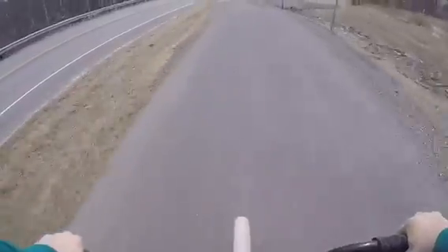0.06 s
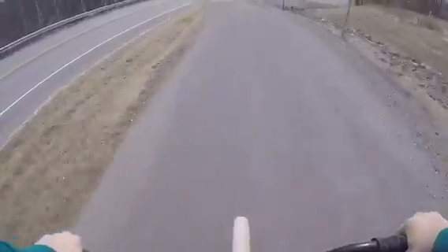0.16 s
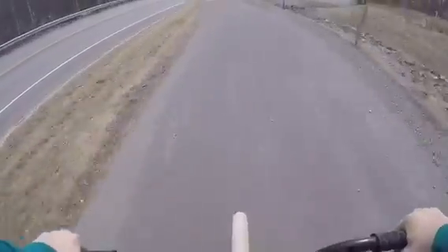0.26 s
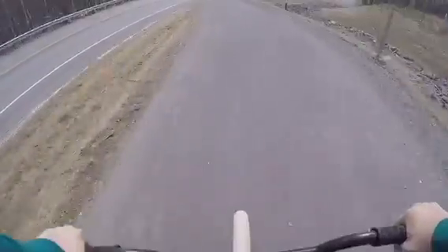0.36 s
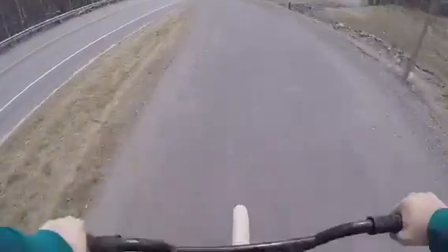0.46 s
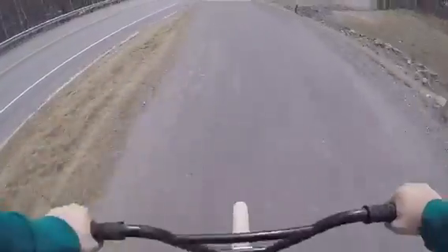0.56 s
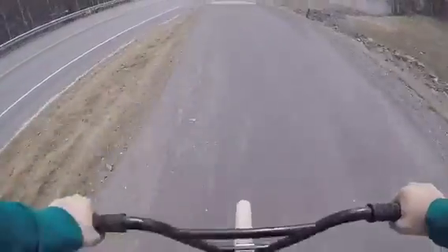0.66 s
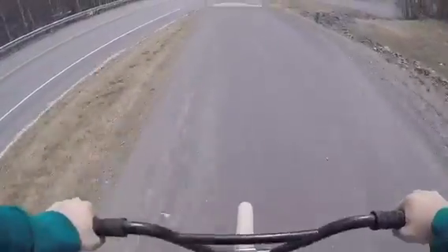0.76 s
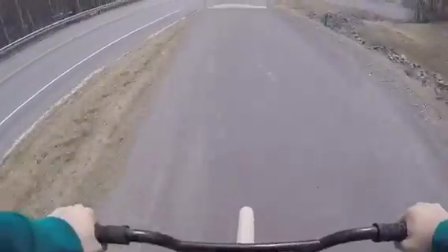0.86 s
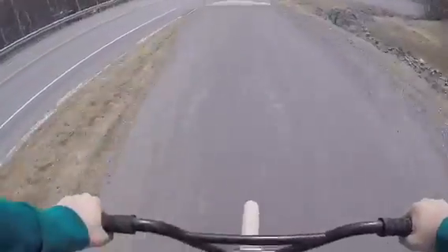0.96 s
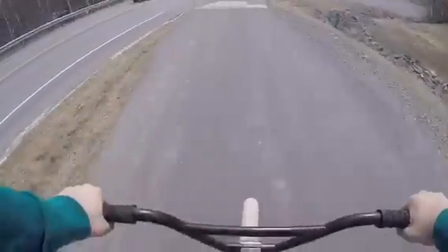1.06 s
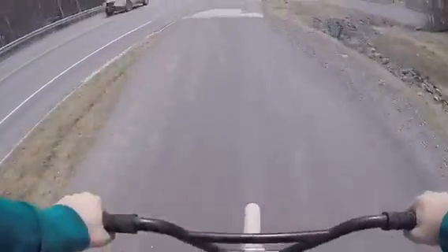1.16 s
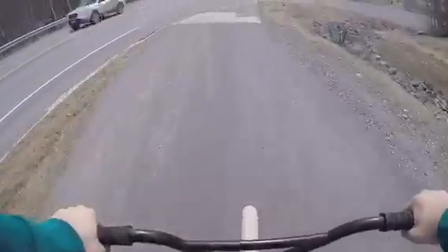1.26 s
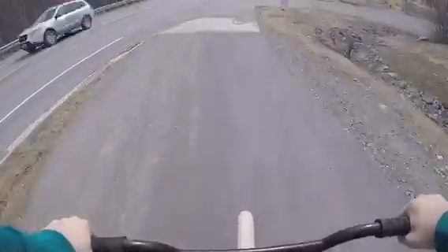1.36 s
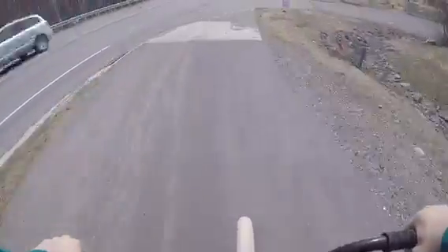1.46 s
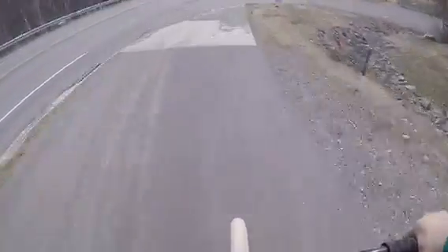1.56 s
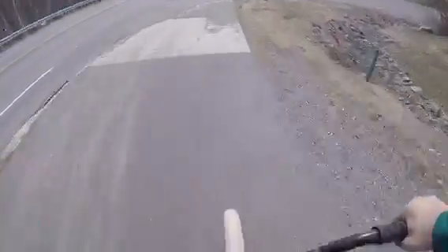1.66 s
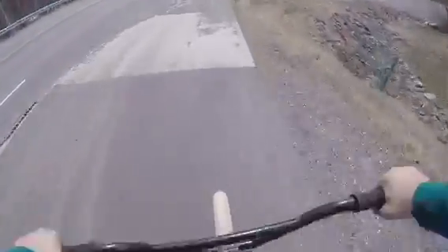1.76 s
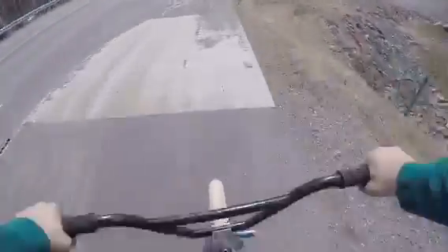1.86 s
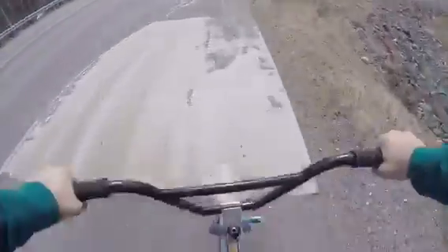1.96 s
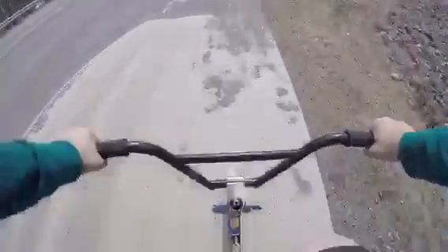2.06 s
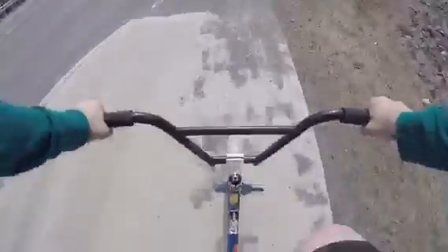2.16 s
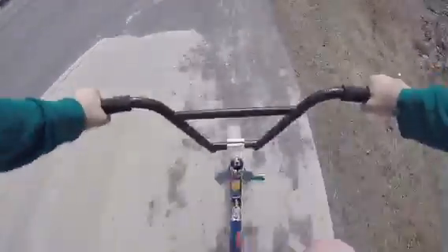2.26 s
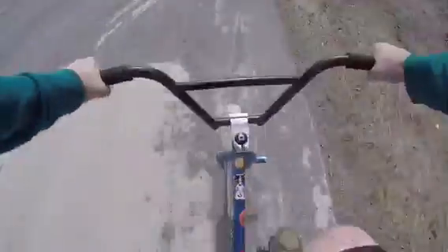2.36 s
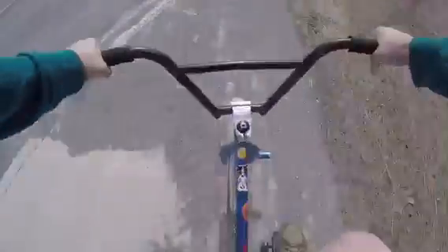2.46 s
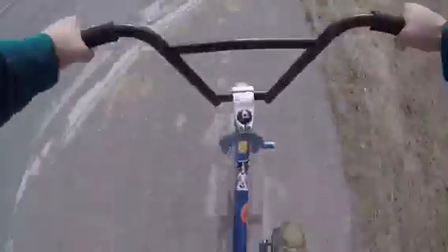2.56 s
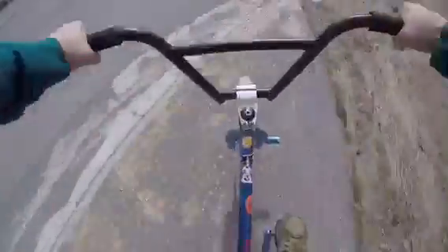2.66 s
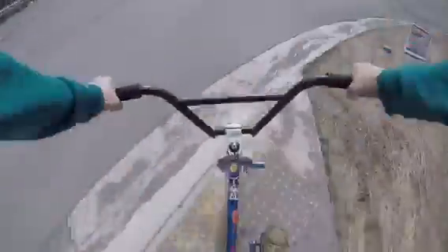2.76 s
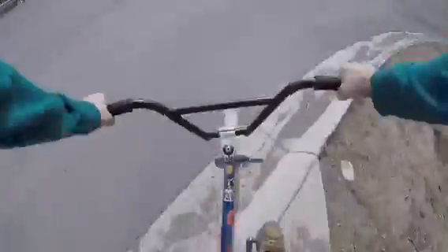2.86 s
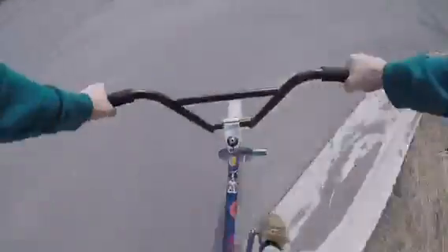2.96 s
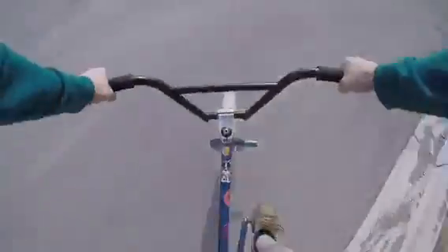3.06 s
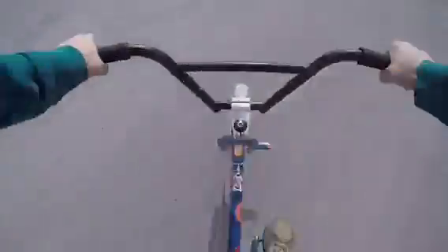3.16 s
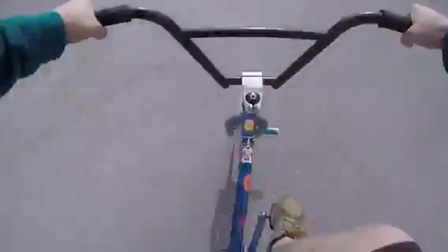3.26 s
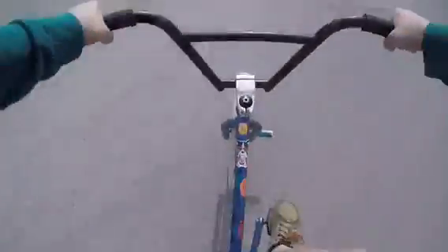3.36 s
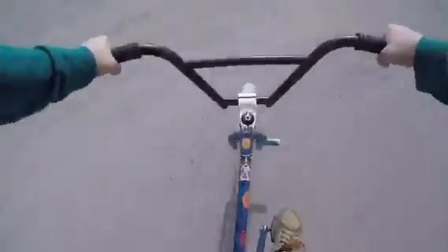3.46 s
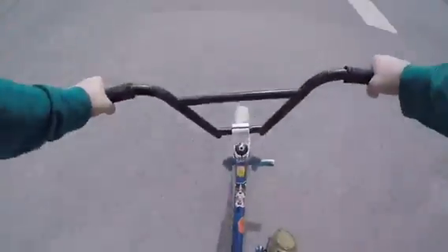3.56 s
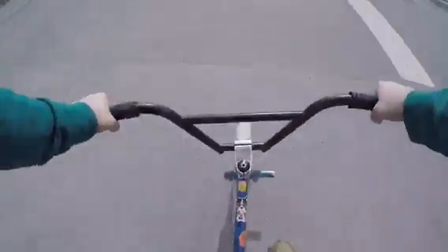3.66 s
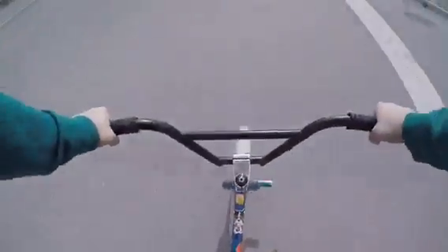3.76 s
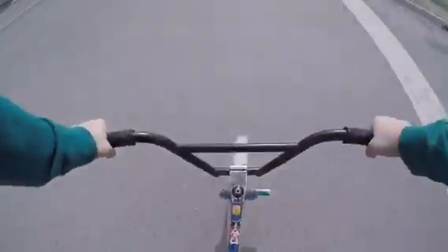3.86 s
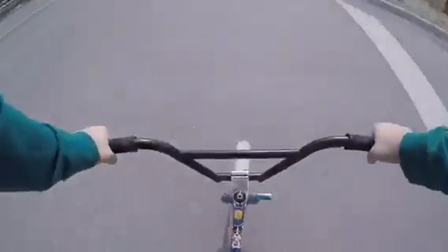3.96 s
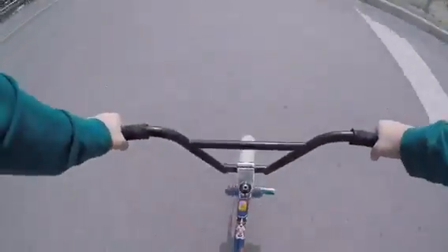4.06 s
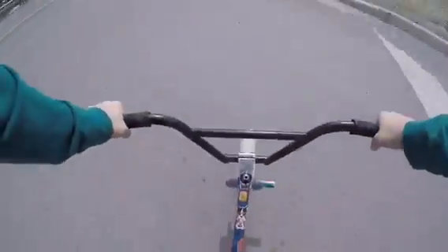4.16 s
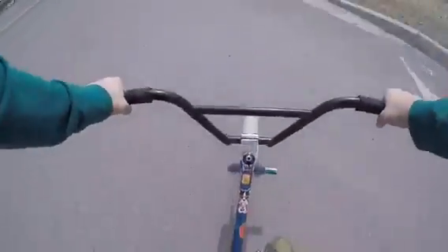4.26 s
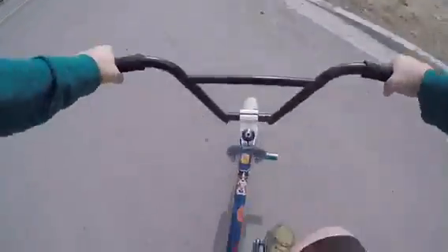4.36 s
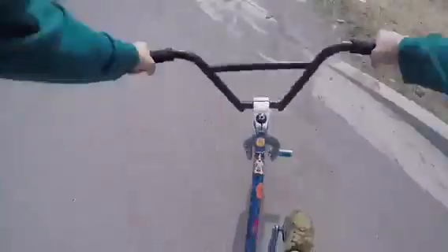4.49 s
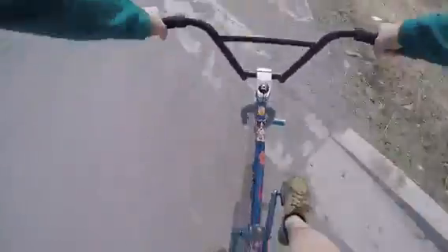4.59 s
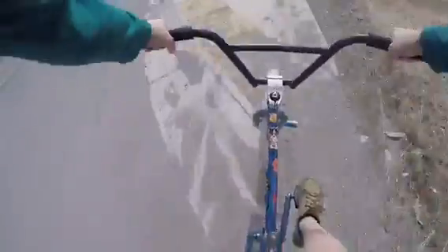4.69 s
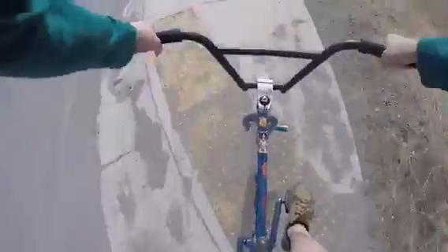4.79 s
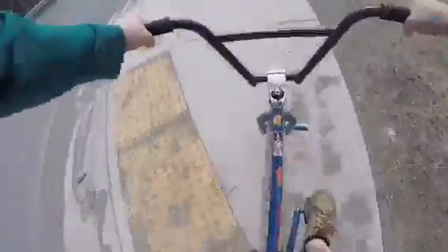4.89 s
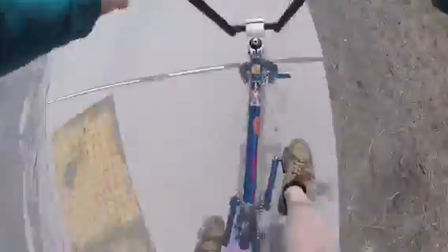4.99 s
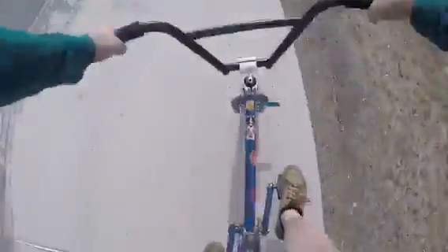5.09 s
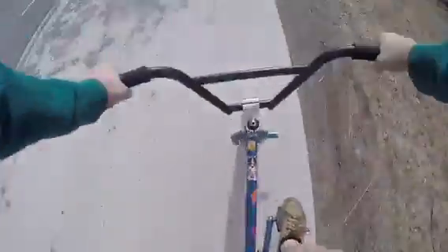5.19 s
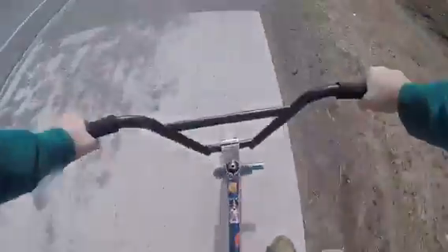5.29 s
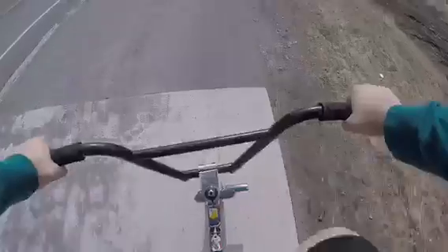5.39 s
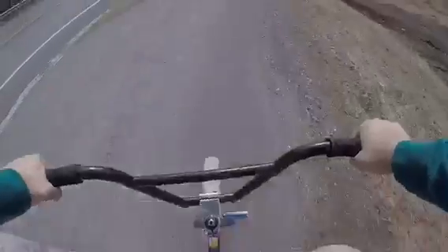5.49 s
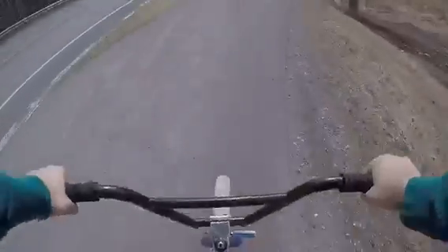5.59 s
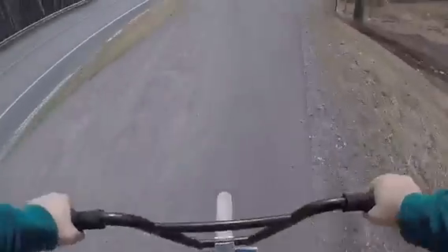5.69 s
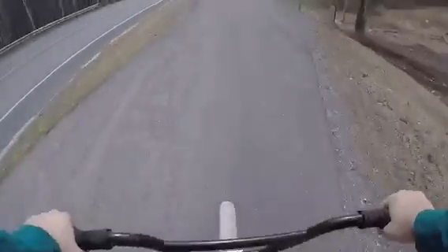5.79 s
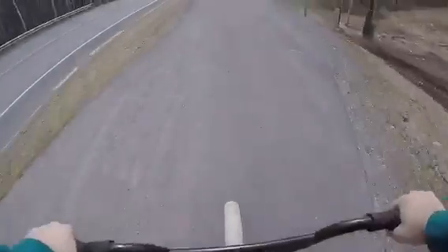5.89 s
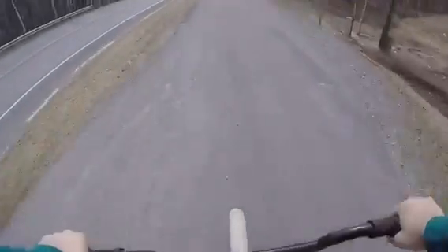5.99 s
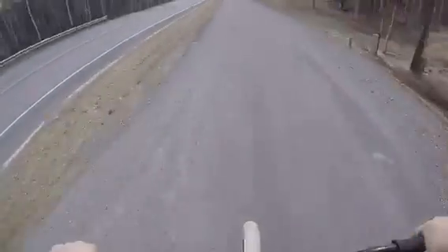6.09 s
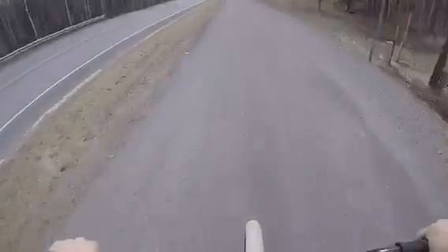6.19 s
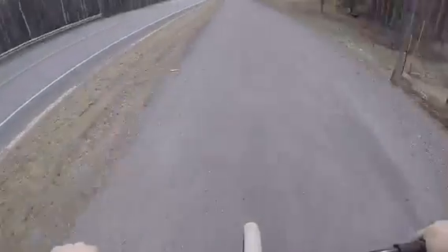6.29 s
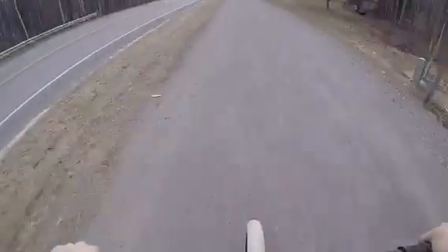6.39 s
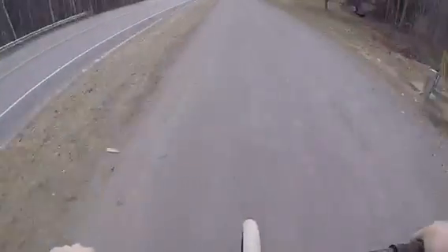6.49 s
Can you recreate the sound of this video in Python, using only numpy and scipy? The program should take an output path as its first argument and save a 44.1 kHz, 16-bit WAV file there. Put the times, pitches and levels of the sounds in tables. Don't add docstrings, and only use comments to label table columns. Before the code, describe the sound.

Hard wheels rush down pavement as a foot brake squeals in broken shrieks, then kerb joints clatter and bang through gusty wind.

```python
import sys
import numpy as np
from scipy import signal
from scipy.fft import rfft, irfft, next_fast_len
from scipy.io import wavfile
from scipy.ndimage import uniform_filter1d

SR = 44100
rng = np.random.default_rng(int(sys.argv[2]) if len(sys.argv) > 2 else 0)


def ratio(d):
    e = np.asarray(d, float) / 20
    return 10 ** e


def unload_wav(signal):
    wavfile.write(
        sys.argv[1],
        SR,
        np.round(np.clip(np.atleast_2d(signal).T, -1, 1) * 32767).astype(np.int16),
    )


N = 288414

# [t/s, level/dB]
CAR_LEVEL = [
    (.9, -53),
    (1.3, -49.5),
    (1.65, -40),
    (1.95, -44.5),
    (2.4, -52),
]
# [f/Hz, density/(dB per Hz)]
TYRE_SPECTRUM = [(300, -20.5), (550, -16), (720, -1.5), (1100, -16), (1900, -6), (2400, -12), (4000, -51)]
# [mid t/s, half length/s, level/dB]
GUSTS = [(0.326, 0.09, -25), (0.67, 0.11, -27), (0.88, 0.085, -18), (1.1, 0.15, -27), (1.36, 0.096, -19.5),
         (2.14, 0.29, -27.5), (2.464, 0.027, -24), (2.676, 0.019, -26), (1.717, 0.068, -24),
         (3.067, 0.054, -21), (3.158, .03, -38), (3.926, 0.037, -22.5), (4.554, 0.016, -30),
         (4.95, 0.09, -21), (5.46, 0.15, -38), (5.68, 0.081, -22.5), (5.98, 0.076, -22),
         (6.467, 0.021, -23)]
# [f/Hz, density/(dB per Hz)]
BUFFET_SPECTRUM = [(10, -8.5), (22, 1), (35, -7), (50, -18.5), (70, -35.5), (110, -56.5), (300, -91)]
# [f/Hz, density/(dB per Hz)]
EDGE_SPECTRUM = [(30, -41), (60, 10.5), (90, -6), (130, 0), (180, -2), (300, -36.5), (800, -48)]
# [t/s, level/dB]
MOUNT_SHUDDER = [(0.0, -47), (0.25, -51), (1.89, -49.5), (2.24, -43.5), (2.5, -53), (2.75, -43),
                 (2.97, -40), (3.31, -54), (3.48, -47), (3.81, -43.5), (4.24, -50), (5.03, -39),
                 (5.52, -49.5), (5.72, -53), (6.05, -53), (6.54, -58)]
# [t/s, peak/dB, first swing f/Hz, direction/+-1, stop hardness/0-1]
JOLTS = [(2.553, -22.5, 29.8, -1, 0), (2.598, -10, 29.3, -1, 0.1), (2.841, -6, 31, 1, 0),
         (3.194, -4, 29, 1, 0.17), (3.2498, -6.5, 56, -1, 0.6), (3.364, -11, 29.7, -1, 0.24),
         (4.607, 1, 31.7, 1, 1), (5.0374, 0, 40, 1, 0.28), (5.474, -18.5, 79, -1, 0.75),
         (5.589, -19, 61, 1, 0.25), (5.616, -17, 31.7, -1, 0), (5.706, -16.5, 50, 1, 1)]
# [t/s, peak/dB, half length/s, direction/+-1]
THUMPS = [(2.582, -22, .002, -1), (2.671, -19, 0.0028, -1), (2.9, -22, 0.0052, 1), (2.9, -19, 0.0035, -1),
          (2.815, -18, 0.004, 1), (2.829, -9, 0.0023, -1), (2.832, -25, 0.0016, 1), (3.324, -11, 0.0037, 1),
          (3.339, -6, 0.0024, -1), (3.344, -5, 0.0031, 1), (3.354, -14, 0.0023, -1),
          (3.205, -9.5, 0.0037, 1), (2.6, -11, 0.0055, 1), (4.627, -13, .006, 1), (3.358, -21, 0.0023, -1),
          (4.606, -18, 0.0015, -1), (4.1, -27, 0.0024, 1)]
# [t/s, peak/dB, f/Hz, length/cycles]
SNAPS = [(3.2059, -2, 2650, 1.3), (3.2076, -14, 4180, 1.5), (3.2078, -8, 1400, 1.5),
         (3.2343, -24, 2400, 1.4), (3.3088, -19, 1100, .9), (3.3092, -25, 3200, 2.),
         (3.3213, -16, 1000, 1.1), (3.331, -15, 2630, 2.4), (3.3315, -19, 1600, 1.5),
         (3.3352, -14.5, 2020, 1.4), (3.339, -22, 2800, 2.2), (3.3428, -22, 2600, 2.1),
         (3.346, -23, 2700, 2.4), (3.35, -25, 1500, 1.2), (3.3612, -24, 2600, 2.), (3.3615, -26, 1400, 1.3),
         (2.6968, -22, 1150, 1.3), (2.681, -27, 900, 1.4), (2.737, -19, 3000, 2.3), (2.799, -28, 1610, 4.),
         (2.8286, -18.5, 2400, 1.7), (2.827, -22, 1000, 1.6), (2.833, -23, 2800, 2.2),
         (2.4392, -18, 2700, 2.2), (2.5285, -24, 2890, 2.4), (3.479, -32, 3300, 2.2),
         (3.588, -30, 2600, 1.8), (3.695, -35, 4600, 2.4), (3.796, -32, 2300, 1.8), (4.083, -23, 3240, 2.4),
         (4.255, -29, 4300, 2.6), (4.384, -31, 2600, 1.8), (4.611, -19, 2600, 4.), (4.854, -27, 2724, 4.),
         (2.596, -16, 1000, 1.9), (4.876, -17, 2750, 3.9), (4.8915, -15, 2500, 2.8),
         (4.9983, -17, 2500, 3.), (5.047, -18.5, 2840, 3.), (5.0755, -25, 815, 1.6)]
# [t/s, peak/dB, ring f/Hz, crack re knock/dB]
KNOCKS = [(2.5838, -10, 960, -20), (2.585, -9, 398, -20), (2.592, -14, 570, -23), (2.343, -31, 4050, -20),
          (2.677, -28, 754, -6), (2.697, -16.5, 563, -16), (2.822, -20.5, 310, 14), (2.834, -14.5, 756, 0),
          (3.2075, -4.5, 400, -6), (3.2089, 4, 938, -14), (3.2145, -11, 570, -26), (3.2335, -16, 836, -3),
          (3.283, -28, 864, -20), (3.302, -28, 1000, -10), (3.3109, -4.5, 963, -10), (3.3126, -9, 433, -20),
          (3.321, -16, 830, -4), (3.336, -2, 900, -14), (3.347, -20, 301, 7), (4.388, -31, 625, 5),
          (4.538, -20, 910, -15), (4.548, -18, 930, -10), (4.577, -10.5, 1100, -20), (4.588, -15, 800, 11),
          (4.5953, -12, 1770, -5), (4.596, -6, 552, -14), (4.603, -12.5, 945, 0), (4.605, -8, 594, 7.5),
          (4.609, -15, 960, 14), (4.638, -18.5, 915, -28), (4.707, -16.5, 950, -33), (4.803, -27, 346, -15),
          (4.875, -19.5, 3760, -20), (4.944, -19, 306, -8), (5.003, -8.5, 286, -20), (4.9975, 2, 1022, -14),
          (5.0012, -2.5, 760, -13), (5.0067, -16, 605, 0), (5.012, -11.5, 490, 2), (5.02, -11.5, 616, 8),
          (5.0243, -10.5, 936, 6), (5.029, -16, 1010, 13.5), (5.0724, -19, 1000, -8),
          (5.076, -19.5, 686, -12), (5.331, -28.5, 1070, 15), (5.477, -28, 1057, -14), (5.584, -35, 625, 1),
          (5.706, -31, 303, -19)]
# [t/s, length/s, hollow level/dB, hollow f/Hz, grind level/dB]
SCRAPES = [
    (2.545, 0.088, -38, 685, -32.5),
    (3.277, 0.051, -37, 885, -40),
    (3.333, 0.021, -27, 1340, -34),
    (4.502, 0.08, -33, 870, -32.5),
    (4.587, 0.021, -32, 1490, -28.5),
    (4.848, 0.04, -77, 1510, -35),
    (4.913, 0.088, -36.5, 840, -33),
    (5.013, 0.034, -38, 1650, -33),
    (5.425, 0.077, -38.5, 980, -46),
]
# [t/s, length/s, level/dB, from f/Hz, to f/Hz]
SLIDES = [
    (.641, .016, -9, 2480, 2560),
    (.876, .02, -8, 2440, 2540),
    (1.303, .024, -10, 2805, 2635),
    (1.342, 0.079, -22, 2590, 2756),
    (1.424, .022, -11, 2758, 2613),
    (1.456, 0.027, -21, 2420, 2310),
]
# [t/s, pressure/dB]
BRAKE_PRESSURE = [(.36, -64), (.4, -37.5), (.495, -37.5), (.52, -24.5), (.8, -29.5), (.93, -23),
                  (1.05, -27), (1.44, -24), (1.592, -30.5)]
# [t/s, length/s, squeal level/dB, scrub hush/dB]
LOCKS = [(0.639, 0.058, -25, -2.5), (0.743, 0.061, -26, -5), (0.816, 0.022, -19, -3),
         (0.855, 0.043, -18.5, -11), (0.984, 0.035, -19, -1.5), (1.071, 0.097, -14.5, -18.5),
         (1.178, 0.025, -16, -4), (1.226, 0.076, -16, -11.5), (1.303, 0.075, -20.5, -7.5),
         (1.388, 0.042, -17, -17.5), (1.432, 0.041, -24.5, -11)]
# [t/s, length/s, gain/dB]
SKIPS = [
    (0.787, 0.007, -4),
    (0.891, 0.098, -8),
    (1.019, 0.062, 3.5),
    (1.208, 0.0089, -10),
    (1.374, 0.0091, -16),
    (1.48, .12, -3),
]
# [t/s, peak/dB, f/Hz, octave re grab/dB]
GRABS = [(0.398, -15, 2280, -16), (0.457, -18, 2480, -35), (0.5425, -12, 2780, -34),
         (0.481, -16, 2630, -28), (.503, -12, 2770, -30), (.519, -13, 2060, -17), (0.555, -12, 2610, -15),
         (.62, -11, 2720, -25), (.667, -6, 2300, -21), (.673, -11, 2740, -18), (.684, -18, 2530, -25),
         (0.712, -6, 2520, -25), (0.723, -7, 2260, -19.5), (.746, -11, 2560, -25), (.773, -7, 2660, -24),
         (.79, -15, 2590, -18), (0.833, -3.5, 2770, -31), (1.125, -4, 2524, -26), (0.6035, -2, 2740, -21),
         (0.63, -5.5, 2300, -14.5), (0.6544, -7, 2740, -27), (0.6962, -4, 2675, -19),
         (0.765, -0.5, 2740, -20), (0.809, 0, 2490, -14), (0.8135, 1, 2250, -15.5),
         (0.861, -0.5, 2680, -10), (0.869, -7, 2330, -15), (0.995, -9, 2680, -11), (1.2188, 0.5, 2640, -36),
         (1.2442, -1, 2520, -16), (1.295, -8.5, 2400, -8), (1.382, -2.5, 2590, -35), (1.061, -7, 2720, -13),
         (1.313, -5, 2667, -29), (1.411, -3, 2710, -29), (1.434, 0, 2650, -26), (1.466, -17, 2360, -5)]
# [t/s, f/Hz]
SQUEAL_PITCH = [(.5, 2620), (.642, 2450), (.66, 2740), (.69, 2480), (.795, 2510), (.815, 2421),
                (.824, 2700), (.862, 2680), (.895, 2440), (.98, 2470), (1.01, 2510), (1.068, 2520),
                (1.085, 2460), (1.12, 2510), (1.145, 2455), (1.2, 2450), (1.235, 2490), (1.262, 2445),
                (1.28, 2515), (1.305, 2420), (1.33, 2490), (1.36, 2460), (1.385, 2480), (1.4, 2418),
                (1.45, 2415)]
# [f/Hz, width/Hz, level/dB]
FENDER_MODES = [(3916, 160, -12.5), (4560, 43, -19.5), (4770, 80, -19), (5600, 63, -26), (6540, 200, -24),
                (7320, 1100, -20.5)]
# [f/Hz, density/(dB per Hz)]
SCRUB_SPECTRUM = [(290, -53), (500, -45), (592, -22), (708, -12), (1000, -0.5), (1280, -7.5), (1570, -2.5),
                  (1860, -10.5), (2100, 5.5), (2730, -59), (4620, -120)]
# [t/s, deck shake/dB]
PAVING_SHAKE = [(0, -44), (.45, -46), (.6, -52.5), (1.6, -48.5), (2.24, -49), (2.45, -41), (2.72, -41),
                (2.8, -38.5), (2.88, -47.5), (3.6, -46.5), (4.25, -48), (4.45, -45), (4.9, -44.5),
                (5.15, -49), (5.44, -46.5), (6.0, -47.5), (6.54, -49)]
# [t/s, hum change/dB]
ROAD_RIPPLE = [(0, -2), (.45, -1.5), (1.0, -4.5), (1.6, -2), (2.3, -0.5), (2.9, 2), (3.5, 0), (4.3, -2.5),
               (4.9, 6), (5.4, 0.5), (5.8, -1.5), (6.54, -3)]
# [t/s, hiss change/dB]
BEARING_LOAD = [(0, 1), (1.6, -1.5), (2.3, -0.5), (3.3, -2), (4.0, 1.5), (5.4, 1.5), (6.54, -2)]
# [t/s, rasp change/dB]
LOOSE_SAND = [(0, 8), (2.2, 0.5), (2.26, -9), (2.5, 2), (2.85, 2), (3.0, 6), (3.6, -11), (4.5, -4.5),
              (4.9, 2), (5.3, -5), (6.54, 4)]
# [t/s, peak/dB]
STONES = [(1.955, -21), (2.007, -26.5), (2.239, -24.5), (2.2537, -23.5), (2.272, -31), (2.289, -29),
          (2.309, -32), (2.397, -22.5), (2.53, -37), (2.594, -16.5), (2.631, -23), (2.699, -24),
          (2.78, -25), (2.908, -26.5), (3.363, -36), (4.502, -24), (4.612, -23), (5.026, -22.5),
          (2.3372, -26), (2.3435, -20.5), (2.376, -23.5), (2.441, -20), (2.4994, -25), (2.549, -17.5),
          (2.5862, -17), (2.654, -19), (2.7356, -26), (2.814, -26), (3.1676, -25), (3.2058, -17),
          (3.329, -32), (4.0813, -26), (4.329, -27), (4.3516, -23), (4.873, -25), (4.8904, -21),
          (4.937, -19.5), (4.9982, -26), (5.02, -32), (5.045, -18), (5.351, -27.5), (5.609, -25),
          (6.1475, -24), (6.179, -24.5), (6.244, -26), (6.476, -29)]
# [f/Hz, density/(dB per Hz)]
HUM_SPECTRUM = [(59, -7.5), (100, -4), (145, -8), (182, -19), (329, -11), (408, -15), (1370, -17),
                (1500, -17.5), (1950, -26), (3300, -120)]
# [f/Hz, width/Hz, level/dB]
DECK_MODES = [(1560, 73, -61.5), (2390, 82, 3), (2953, 436, -0.5), (3367, 91, 2.5), (3813, 81, -3.5),
              (4620, 71, -9.5)]
# [f/Hz, density/(dB per Hz)]
DECK_BED = [(530, -10.5), (900, -1.5), (1370, -10.5), (1680, 5), (1880, -5.5), (2870, 10), (3150, -14),
            (3360, -3.5), (4620, -5.5), (6000, -29.5), (7800, -62), (13200, -120)]
# [f/Hz, width/Hz, level/dB]
BEARING_MODES = [(6430, 110, -2), (7050, 58, 0.5), (7700, 80, -1), (7920, 90, -1.5), (8390, 420, -2),
                 (8900, 110, -12), (9370, 150, -3.5), (10060, 61, -4), (11540, 220, -10.5),
                 (12700, 90, -13), (13450, 380, -12.5), (14100, 58, -18)]
# [f/Hz, density/(dB per Hz)]
BEARING_BED = [(2940, -22.5), (5000, 5.5), (5930, -4), (6430, 1.5), (9000, -2), (9760, 5.5), (12200, -11.5),
               (13900, -5.5), (15500, -10.5)]

SCRUB_DB = -6


def evened(x):
    return x / np.sqrt(np.mean(x ** 2) + 1e-20)


def read(points, f_hz):
    f, value = np.transpose(points)
    return np.interp(np.log(f_hz + 1), np.log(f + 1), value)


def curve(points):
    t_s, value = np.transpose(points)
    return np.interp(np.arange(N) / SR, t_s, value)


def add(mix, t_s, sound):
    part = mix[round(t_s * SR):][:len(sound)]
    part += sound[:len(part)]


def filtered_noise(gain_at):
    size = next_fast_len(N)
    z = rfft(rng.standard_normal(size)) * gain_at(np.fft.rfftfreq(size, 1 / SR))
    return evened(irfft(z, size)[:N])


def coloured(points):
    return filtered_noise(lambda f_hz: ratio(read(points, f_hz)))


def wander(rate_hz):
    return filtered_noise(lambda f_hz: 1 / (1 + (f_hz / rate_hz) ** 4))


def resonate(x, f_hz, width_hz):
    turn = np.exp(2j * np.pi * np.cumsum(f_hz * np.ones(len(x))) / SR)
    r = np.exp(-np.pi * width_hz / SR)
    return 2 * (turn * signal.lfilter([1 - r], [1, -r], x / turn)).real


def band(x, f_hz, width_hz):
    return evened(resonate(resonate(x, f_hz, width_hz), f_hz, 1.53 * width_hz))


def metal_response(modes, bed, bed_db):
    hz = abs(np.fft.fftfreq(8192, 1 / SR))
    power = ratio(read(bed, hz) + bed_db) ** 2
    for f_hz, width_hz, db in modes:
        power = power + ratio(db) ** 2 / (1 + (2 * (hz - f_hz) / width_hz) ** 2) ** 1.444
    log_gain = np.log(np.maximum(power, 1e-10)) / 2
    ring = np.fft.ifft(np.exp(np.conj(signal.hilbert(log_gain)))).real[:4096]
    return ring / np.linalg.norm(ring)


def shimmer(x, patchy_db):
    z = signal.stft(x, nperseg=512)[2]
    patches = uniform_filter1d(rng.standard_normal(z.shape), size=4, axis=0)
    patches = uniform_filter1d(patches, size=16, axis=1)
    return signal.istft(z * ratio(patchy_db * evened(patches)), nperseg=512)[1][:N]


def car():
    t_s, db = np.transpose(CAR_LEVEL)
    level_db = np.interp(np.arange(N) / SR, t_s, db, left=-90, right=-90)
    return ratio(level_db) * coloured(TYRE_SPECTRUM)


def wind():
    calm_db, edge_db, edge_share = -33, 0.5, 0.19
    shake_db, shake_before_s, shake_after_s = -22, 0.036, 0.013
    t = np.arange(N) / SR
    power = ratio(calm_db) ** 2
    for t_s, half_s, db in GUSTS:
        power = power + ratio(db) ** 2 * np.exp(-((t - t_s) / half_s) ** 2)
    edge = ratio(edge_db + curve(MOUNT_SHUDDER)) * (np.sqrt(power) / ratio(calm_db)) ** edge_share
    for t_s, db, _, _, hard in JOLTS:
        fade_s = np.where(t < t_s, shake_before_s, shake_after_s)
        edge = edge + (0.19 + hard) * ratio(db + shake_db) * np.exp(-abs(t - t_s) / fade_s)
    puffs_db = 2.5 * wander(rate_hz=12)
    return np.sqrt(power) * coloured(BUFFET_SPECTRUM) + edge * ratio(puffs_db) * coloured(EDGE_SPECTRUM)


def jolts():
    t60_at_33hz_s, t60_slope = 0.22, 3
    out, t = np.zeros(N), np.arange(-1400, 8000) / SR
    for t_s, db, f_hz, direction, hard in JOLTS:
        t60_s = t60_at_33hz_s * (33 / f_hz) ** t60_slope
        turns = f_hz * 0.0385 * np.sign(t) * np.log1p(abs(t) / 0.033)
        fall = np.where(t < 0, np.exp(-(t * f_hz / 0.5) ** 2), ratio(-60 * t / t60_s))
        stop = hard * np.exp(-(t * f_hz / 0.058) ** 2)
        swing = (fall * np.cos(2 * np.pi * turns) + stop) / (1 + hard)
        add(out, t_s + t[0], -np.sign(direction) * ratio(db) * swing)
    return out


def thumps():
    out, t = np.zeros(N), np.arange(-700, 700) / SR
    for t_s, db, half_s, direction in THUMPS:
        add(out, t_s + t[0], np.sign(direction) * ratio(db) * np.exp(-(t / half_s) ** 2))
    return out


def snaps():
    out, t = np.zeros(N), np.arange(-300, 300) / SR
    for t_s, db, f_hz, cycles in SNAPS:
        swell = np.exp(-(t * f_hz / cycles) ** 2)
        add(out, t_s + t[0], -ratio(db) * swell * np.cos(2 * np.pi * f_hz * t))
    return out


def knocks():
    length_s, pitch_slope, level_slope = 0.0047, 0.031, 0.023
    housing_hz, housing_db, housing_s = 569.7, -20, 0.016
    out, t = np.zeros(N), np.arange(2600) / SR
    blows = rng.standard_normal((len(KNOCKS), len(t)))
    for (t_s, db, f_hz, crack_db), blow in zip(KNOCKS, blows):
        u = t / (length_s * (700 / f_hz) ** pitch_slope * ratio(level_slope * db))
        push = (1 - np.exp(-(u / 0.36) ** 2)) * (np.exp(-u ** 2) + 0.072 * np.exp(-t / 0.019))
        tail = ratio(housing_db) * np.minimum(u, 1) * np.exp(-t / housing_s)
        tail = tail * np.sin(2 * np.pi * housing_hz * t)
        ring = np.sin(2 * np.pi * f_hz * t)
        ring = ring + 0.33 * band(blow, 1.1 * f_hz, 500) + 0.33 * band(blow, 0.48 * f_hz, 320)
        crack = evened(band(band(blow[::-1], 2520, 1300), 2000, 2700)) * np.exp(-u)
        add(out, t_s - .0015, ratio(db - 1.5) * (push * (ring + ratio(crack_db - 12.5) * crack) + tail))
    return out


def scrapes():
    out = np.zeros(N)
    noise = rng.standard_normal((len(SCRAPES), 3, 4400))
    for (t_s, length_s, hollow_db, hollow_hz, grind_db), z in zip(SCRAPES, noise):
        drag = ratio(hollow_db) * band(z[0], hollow_hz, 560) + ratio(grind_db) * band(z[1], 2740, 950)
        lumps = ratio(0.61 * evened(uniform_filter1d(uniform_filter1d(z[2], 90), 90)))
        size = min(round(length_s * SR), len(drag))
        add(out, t_s, (drag * lumps)[:size] * signal.windows.tukey(size, .6))
    return out


def slides():
    out = np.zeros(N)
    for t_s, length_s, db, from_hz, to_hz in SLIDES:
        f_hz = np.linspace(from_hz, to_hz, round(length_s * SR))
        whistle = np.sin(2 * np.pi * np.cumsum(f_hz) / SR)
        add(out, t_s, ratio(db) * whistle * np.hanning(len(f_hz)) ** .5)
    return out


def foot():
    lock_edge_s, release_s = .013, .006
    start_s, end_s = BRAKE_PRESSURE[0][0], BRAKE_PRESSURE[-1][0]
    t = np.arange(round(end_s * SR)) / SR

    def held(t_s, length_s):
        return np.clip(np.minimum(t - t_s, t_s + length_s - t) / lock_edge_s + .5, 0, 1)

    pressure = ratio(curve(BRAKE_PRESSURE)[:len(t)])
    pressure = pressure * (t > start_s) * np.clip((end_s - t) / release_s, 0, 1)
    locked = sum(ratio(db) * held(t_s, length_s) for t_s, length_s, db, _ in LOCKS)
    hush_db = sum(db * held(t_s, length_s) for t_s, length_s, _, db in LOCKS)
    skip_db = sum(db * held(t_s, length_s) for t_s, length_s, db in SKIPS)
    return pressure, locked, ratio(hush_db), ratio(skip_db)


def brake():
    free_db, upper_db, lower_db = -8.5, 1.3, -2.5
    pressure, lock, hush, skip = foot()
    size = len(lock)
    main_hz = curve(SQUEAL_PITCH)[:size]
    rub = rng.standard_normal((4, size))
    pitch, grip, slips, flutter, rough = (wander(hz)[:size] for hz in (44.5, 85, 7.9, 125, 18))

    locked = np.sqrt(2) * np.cos(2 * np.pi * np.cumsum(main_hz + 22 * pitch) / SR)
    main = evened(locked * ratio(2.2 * grip) + .62 * hush ** .5 * band(rub[0], main_hz, 210))
    upper = evened(band(rub[1], 2735 + 45 * slips, 123) * ratio(3.0 * flutter))
    lower = evened(band(rub[2], 2270 + 60 * pitch, 410) * ratio(-3.0 * flutter))
    squeal = (ratio(free_db) * pressure + lock) * main
    squeal += pressure * ratio(upper_db) * hush ** 0.089 * upper
    squeal += pressure * ratio(lower_db) * hush ** 0.37 * lower
    squeal = squeal * skip

    rattle, u = np.zeros(size), np.arange(1300) / SR
    for t_s, db, f_hz, octave_db in GRABS:
        burst = ratio(db) * (1 - np.exp(-u / 0.0029)) * np.exp(-(u / 0.0048) ** 2)
        add(squeal, t_s - .002, burst * np.sin(2 * np.pi * f_hz * u))
        add(rattle, t_s - .002, ratio(db + octave_db + 7.0) * np.sin(np.pi * np.minimum(u / 0.016, 1)))
    clang = resonate(resonate(rattle * rub[0], 4710, 210), 4900, 460)

    swing = signal.hilbert(squeal, next_fast_len(size))[:size]
    octave = resonate((swing ** 2).real / (abs(swing) + 0.1), 3900, 320)
    force = uniform_filter1d(abs(swing), 700) ** 0.57
    high = sum(ratio(db - 19.5) * band(rub[3], f_hz, width_hz) for f_hz, width_hz, db in FENDER_MODES)
    scrub = pressure * hush * ratio(SCRUB_DB + 1.6 * rough) * coloured(SCRUB_SPECTRUM)[:size]
    overtone = ratio(-23) * band(rub[1], 4840, 230) + ratio(-34) * band(rub[2], 7670, 500)
    sound = squeal + force * hush ** 0.59 * high + clang + scrub + lock * skip * overtone
    sound += ratio(-18) * octave
    return np.pad(sound, (0, N - size))


def rolling():
    hum_level_db, hum_share = -46, 0.48
    hiss_level_db, hiss_share = -56.5, 0.61
    rasp_level_db, rasp_share, rasp_hz = -52.5, 0.63, 3530
    brake_deck_db, brake_hiss_db = -2, -32.5
    shake_db = curve(PAVING_SHAKE)
    rough_db = shake_db + 48
    pressure, _, hush, _ = (np.pad(gain, (0, N - len(gain))) for gain in foot())

    hits = (rng.random(N) < 1500 / SR) * rng.choice([-1, 1], N)
    grit = ratio(2.4 * np.minimum(rng.exponential(1, N), 5)) * hits
    patches_db = wander(rate_hz=39.4)
    grain = rng.standard_normal(N) * ratio(1.45 * patches_db)
    contact = evened(evened(grain) + 0.13 * evened(grit))
    drive = (ratio(shake_db + 7.5) + ratio(SCRUB_DB + brake_deck_db) * pressure * hush) * contact
    t = np.arange(800) / SR
    for (t_s, db), crunch in zip(STONES, rng.standard_normal((len(STONES), len(t)))):
        swell = (1 - np.exp(-(t / 0.001) ** 2)) * np.exp(-t / 0.0028)
        add(drive, t_s - .001, ratio(db + 2.5) * crunch * swell)
    deck = signal.oaconvolve(drive, metal_response(DECK_MODES, DECK_BED, bed_db=-6.0))[:N]

    hiss_db = hiss_level_db + curve(BEARING_LOAD) + hiss_share * rough_db
    shake = ratio(hiss_db) + ratio(brake_hiss_db) * pressure * hush ** 0.4
    shake = shake * ratio(0.88 * patches_db) * rng.standard_normal(N)
    shake += ratio(-33) * drive
    hiss = signal.oaconvolve(shake, metal_response(BEARING_MODES, BEARING_BED, bed_db=-11))[:N]

    hum_db = hum_level_db + curve(ROAD_RIPPLE) + hum_share * rough_db
    hum = ratio(hum_db + 2.3 * wander(rate_hz=25)) * coloured(HUM_SPECTRUM)
    rasp_db = rasp_level_db + curve(LOOSE_SAND) + rasp_share * rough_db
    rasp = ratio(rasp_db) * band(drive / ratio(shake_db), rasp_hz, 1700)
    return shimmer(deck + hiss + rasp * (pressure == 0), patchy_db=2.0) + hum


def scene():
    surroundings = car() + wind()
    camera = jolts() + thumps()
    impacts = snaps() + knocks() + scrapes()
    return (surroundings + camera + impacts + slides() + brake() + rolling())[None]


def roll_off(x):
    return signal.sosfilt(signal.butter(12, 15680, fs=SR, output="sos"), x)


def record(dry):
    limited = dry / (1 + abs(dry / .97) ** 30) ** (1 / 30)
    lowpass = signal.firwin(511, 15270, window=("kaiser", 9), fs=SR)
    mix = signal.oaconvolve(limited, lowpass[None], "same")
    return roll_off(mix)


dry = scene()
out = record(dry)
unload_wav(out)
```